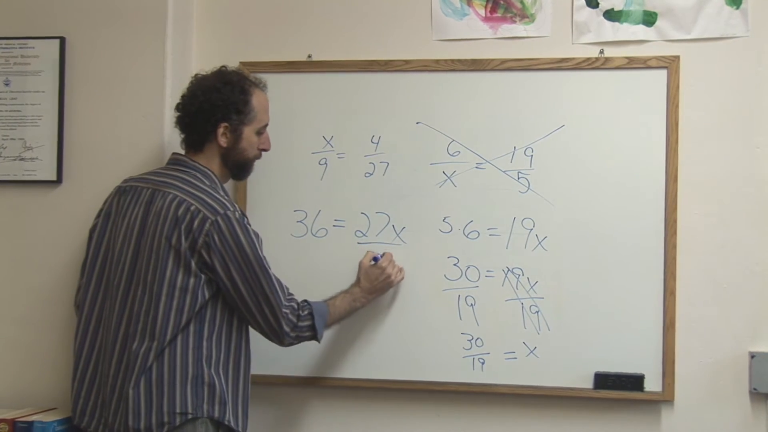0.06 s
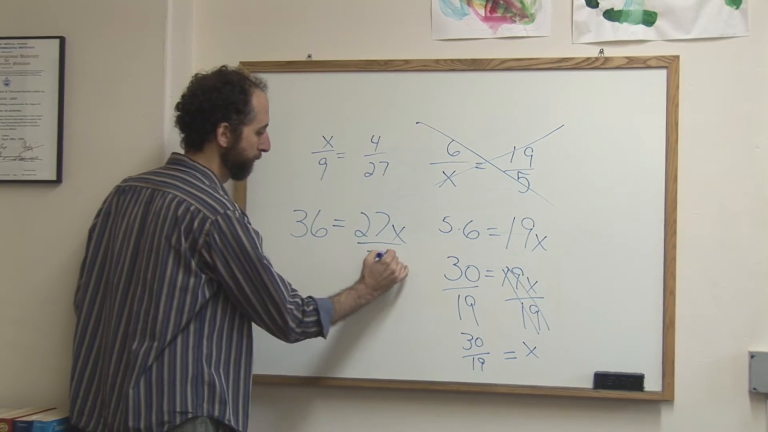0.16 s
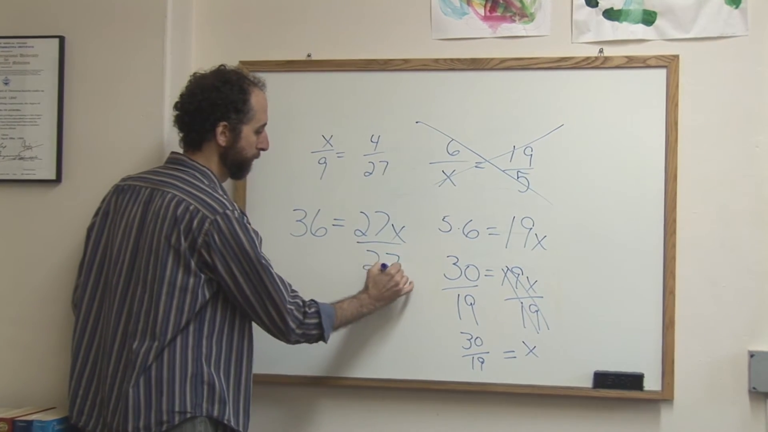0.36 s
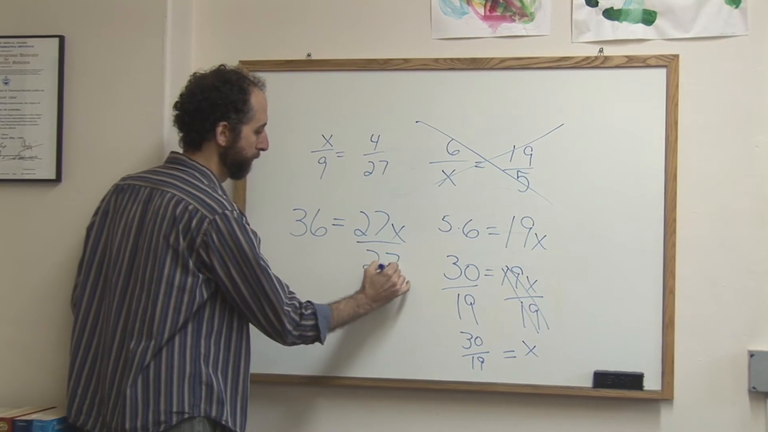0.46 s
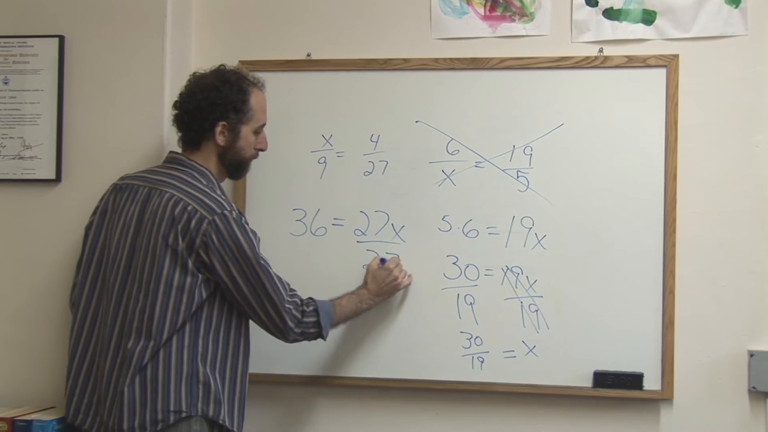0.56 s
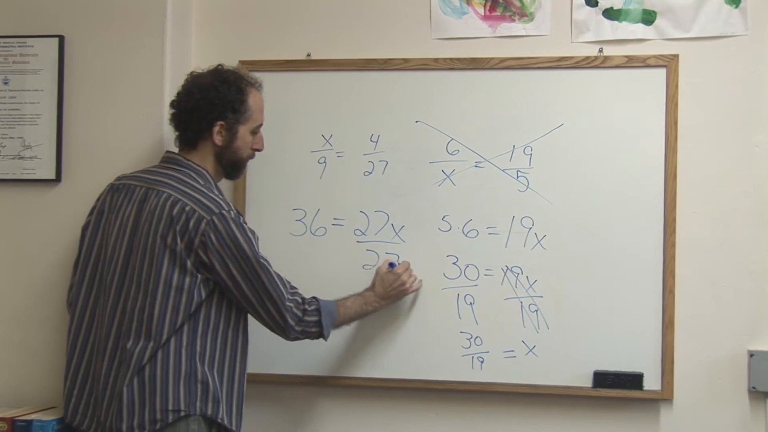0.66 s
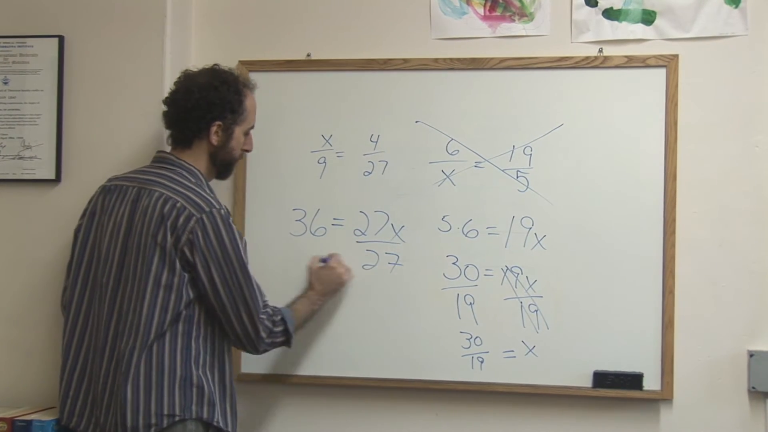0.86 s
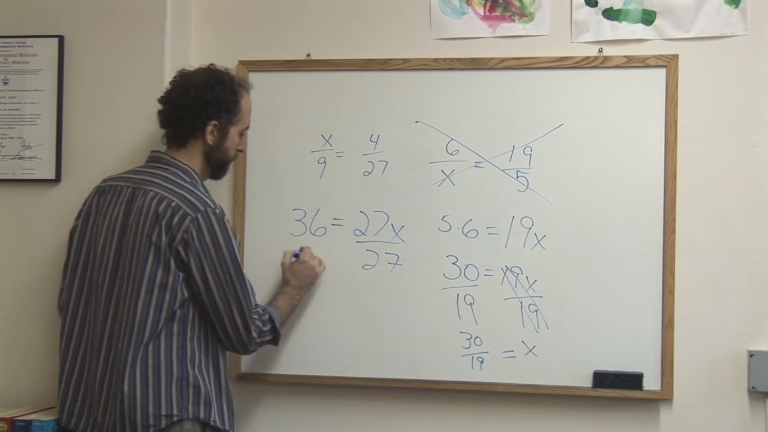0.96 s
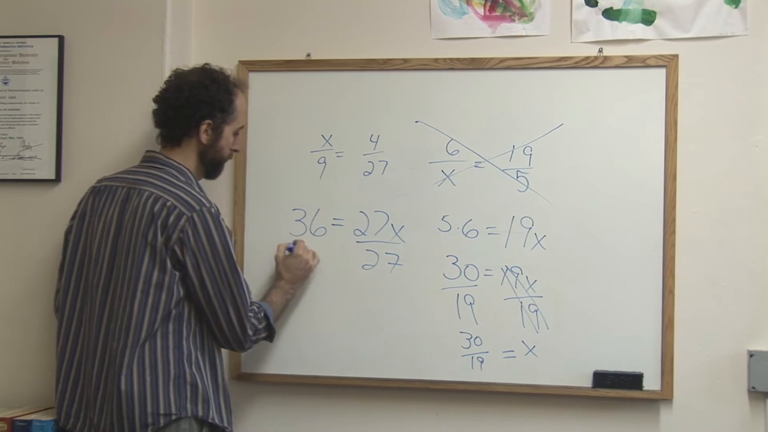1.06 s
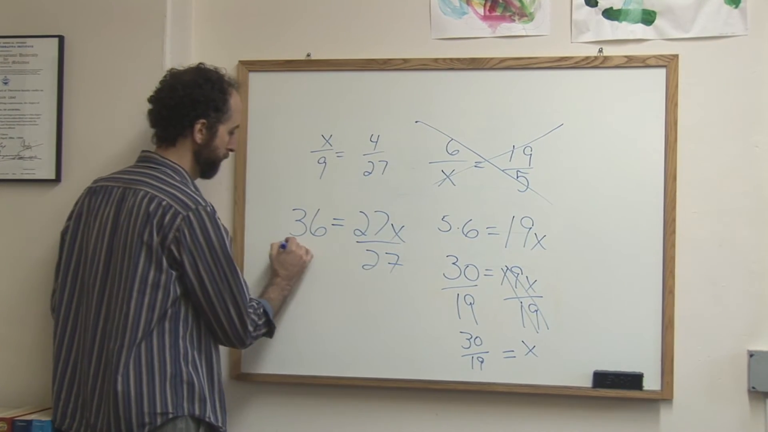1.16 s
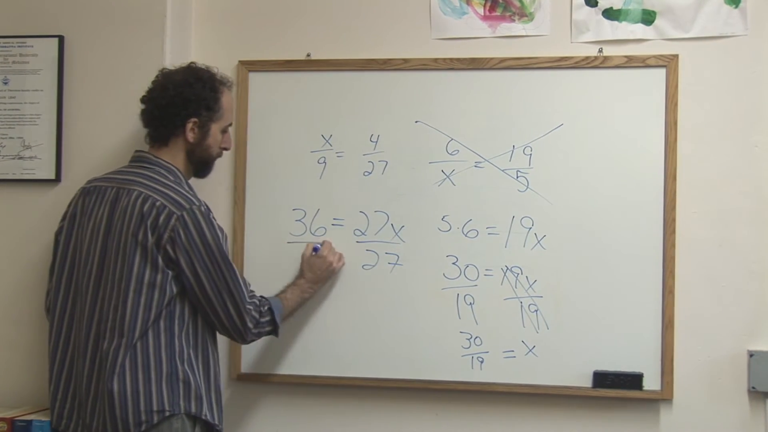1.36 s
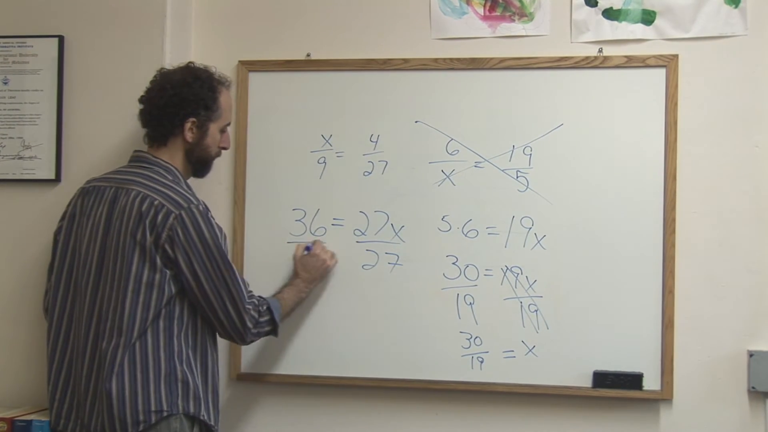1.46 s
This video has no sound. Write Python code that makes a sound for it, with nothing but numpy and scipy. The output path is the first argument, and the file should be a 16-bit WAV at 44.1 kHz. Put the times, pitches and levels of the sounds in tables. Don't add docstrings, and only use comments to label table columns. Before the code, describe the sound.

A felt marker writes on a whiteboard: a firm hollow knock, two lighter taps, another knock, a tiny plastic tick, then a softer landing with a brighter scratch. Small quiet room, ventilation rumble, distant camera microphone.

```python
import sys
import numpy as np
from scipy import signal
from scipy.fft import rfft, irfft
from scipy.io import wavfile
from scipy.ndimage import uniform_filter1d

SR = 44100
rng = np.random.default_rng(int(sys.argv[2]) if len(sys.argv) > 2 else 0)


def nominal_scale(level):
    x = np.asarray(level, float) / 20
    return 10 ** x


def unload_audio(sound):
    columns = np.transpose(np.atleast_2d(sound))
    steps = np.round(np.clip(columns, -1, 1) * 32767)
    wavfile.write(sys.argv[1], SR, steps.astype(np.int16))


N = 66150


def band(x, hz, width_hz):
    return signal.lfilter(*signal.iirpeak(min(hz, .45 * SR), hz / width_hz, fs=SR), x)


def unit(x):
    return x / np.sqrt(np.mean(x ** 2))


def walk(rate_hz):
    k = int(SR / rate_hz)
    smooth = uniform_filter1d(rng.standard_normal(N), k)
    return unit(uniform_filter1d(smooth, k))


def decay(t, t60):
    return np.exp(-np.log(1000) * t / t60)


def rings(t, modes):
    return sum(g * np.sin(2 * np.pi * f * t) * decay(t, t60) for f, g, t60 in modes)


def resonate(x, table):
    out = np.zeros(N)
    for k, (hz, width_hz, db) in enumerate(table):
        peak = band(band(x, hz, width_hz * 1.4), hz, width_hz * 1.4)
        out += (-1) ** k * nominal_scale(db) * unit(peak)
    return unit(out)


# [f/Hz, level/dB per Hz]
AIR_COLOUR = [(30, -7), (130, -7.5), (220, -15.5), (450, -23), (1000, -28.5), (2200, -33.5), (8000, -37.5),
              (14400, -40.5)]
# [f/Hz, level/dB rms, width/Hz]
HUM_LINES = [(35.62, -56.5, 3), (67.9, -67, 8.8), (121.95, -57, 3.26), (254, -67.5, 4.15)]


def air():
    hz = np.maximum(np.fft.rfftfreq(N, 1 / SR), 1)
    colour_hz, colour_db = np.transpose(AIR_COLOUR)
    colour = nominal_scale(np.interp(np.log(hz), np.log(colour_hz), colour_db)) * (hz > 26)
    noise = irfft(rfft(rng.standard_normal(N)) * colour, N)
    hum = np.zeros(N)
    for f, db, width_hz in HUM_LINES:
        level = nominal_scale(db + 0.96 * walk(18)) * np.sqrt(2)
        phase = 2 * np.pi * np.cumsum(f + width_hz * walk(8.2)) / SR
        hum += level * np.sin(phase)
    return nominal_scale(-52) * unit(noise) + hum


# [t/s, level/dB, contact/ms, ring/dB]
LANDINGS = [
    (-.06, -39.5, 1.05, -2),
    (0.088, -49.5, 3.7, 18),
    (.1531, -22.5, 1.037, 1),
    (.223, -37.5, 0.78, -1),
    (.2335, -30.5, 0.71, -8),
    (.543, -24, 1.24, -1.5),
    (.626, -40, 1.5, 7.5),
    (1.1992, -30, 2.23, -7),
    (1.285, -49, 1.05, 0.5),
    (0.408, -55, 2.4, -3),
]
# [f/Hz, level/dB, t60/s, polarity]
PANEL_MODES = [(243, -9, .12, 1), (282, -9, .1, -1), (332, -7, .22, -1), (346, -9, .65, 1),
               (367, -4, .55, 1), (384, -6, .2, 1), (405, -10, .5, 1), (427, -9, .45, 1), (519, 2, .15, -1),
               (600, -7, .16, -1), (642, -2, .08, -1), (800, -14, .06, 1), (1310, -12, .06, 1),
               (1660, -7, .045, -1)]
# [f/Hz, level/dB, t60/s]
WALL_MODES = [(82, -29, 0.017), (128, -23.5, 0.047), (194.3, -27, .15)]
# [f/Hz, width/Hz, level/dB, t60/s]
PANEL_RUSTLE = (800, 500, -25, .15)


def taps():
    thump_hz, thump_width_hz, soft_drop = 416, 278, 0.57
    ring_level_db, spot_db, radiate_hz = -10, 1.5, 220
    panel, low = np.zeros(N + 2 * SR), np.zeros(N + 2 * SR)
    t = np.arange(SR) / SR
    spots = rng.standard_normal((len(LANDINGS), len(PANEL_MODES)))
    noise = rng.standard_normal((len(LANDINGS), SR))
    pulse = (t == 0) * 1.
    wall = rings(t, [(f, nominal_scale(db), t60) for f, db, t60 in WALL_MODES])
    tick = nominal_scale(-10) * band(pulse, 2570, 3200)
    rustle_hz, rustle_width_hz, rustle_db, rustle_t60 = PANEL_RUSTLE
    for (start, db, ms, ring_db), spot, hiss in zip(LANDINGS, spots, noise):
        push = np.where(t < ms / 1000, np.sin(np.pi * t * 1000 / ms) ** 2, 0)
        hz = thump_hz * ms ** -soft_drop
        thump = band(pulse, hz, thump_width_hz * 2)
        thump = band(thump, hz, thump_width_hz)
        thump = band(thump, hz, thump_width_hz * 2)
        modes = [(f, sign * nominal_scale(mode_db + spot_db * v), t60)
                 for (f, mode_db, t60, sign), v in zip(PANEL_MODES, spot)]
        ring = nominal_scale(ring_level_db + ring_db) * rings(t, modes)
        rustle = nominal_scale(rustle_db) * unit(band(hiss, rustle_hz, rustle_width_hz)) * decay(t, rustle_t60)
        body = signal.fftconvolve(thump / thump.max() + ring + rustle, push[:400] / push.sum())[:SR]
        i = int((start + 1) * SR)
        panel[i:i + SR] += nominal_scale(db + 6.5) * (body + tick)
        low[i:i + SR] += nominal_scale(db + 8.5) * wall
    radiated = signal.sosfilt(signal.butter(2, radiate_hz, "high", fs=SR, output="sos"), panel)
    return (radiated + low)[SR:SR + N]


def room(x):
    t60_s, gap_s, top_hz = .5, .006, 1500
    t = np.arange(SR) / SR
    tail = rng.standard_normal(SR) * 1000. ** (-t / t60_s) * np.clip(t / gap_s - .5, 0, 1)
    tail = signal.lfilter(*signal.butter(1, top_hz, fs=SR), tail) + 0.28 * tail
    return nominal_scale(-13) * signal.fftconvolve(x, tail / np.sqrt(np.sum(tail ** 2)))[:N]


# [t/s, length/s, rasp level/dB, panel rub level/dB, slant 0-1]
STROKE_LIST = [
    (.165, .07, -65, -62, .1),
    (.27, .09, -64.5, -64, .1),
    (.548, .065, -64.5, -60, .1),
    (1.2, .15, -61, -56, .9),
    (1.33, .04, -70, -70, .9),
]
# [f/Hz, width/Hz, level/dB]
UPRIGHT_RASP = [(4880, 490, -14.5), (6660, 2100, -14), (10800, 2800, -25.5), (2980, 1700, -16.5)]
# [f/Hz, width/Hz, level/dB]
SLANTED_RASP = [(4080, 600, 2), (6060, 900, 0), (7000, 1800, -0.5), (10940, 1700, -3), (3260, 350, -4),
                (12800, 2500, -11.5)]
# [f/Hz, width/Hz, level/dB]
PANEL_RUB = [(370, 47, -10), (616, 74, -6), (835, 59, -9), (968, 58, 1.5), (1127, 63, 2), (1282, 92, -5),
             (1495, 370, -7)]
# [t/s, length/s, level/dB, f/Hz, width/Hz]
LIFT_SCUFF = (1.345, .06, -57, 740, 420)


def strokes():
    attack_share, release_s = .6, .025
    rub_power = 3.5
    t = np.arange(N) / SR
    grit = rng.standard_normal(N) * nominal_scale(1.5 * rng.exponential(size=N))
    upright = resonate(grit, UPRIGHT_RASP)
    slanted = resonate(grit, SLANTED_RASP)
    rub = resonate(grit, PANEL_RUB)
    start, length, db, hz, width_hz = LIFT_SCUFF
    swell = np.interp(t, [start, start + 0.012, start + length], [0, 1, 0])
    out = nominal_scale(db) * swell * resonate(grit, [(hz, width_hz, 0)])
    for start, length, rasp_db, rub_db, slant in STROKE_LIST:
        end = start + length
        corners = [start, start + attack_share * length, end, end + release_s]
        speed = np.interp(t, corners, [0, 1, 1, 0]) ** .6
        slant = np.clip(slant, 0, 1)
        rasp = (1 - slant) * upright + slant * slanted
        out = out + nominal_scale(rasp_db) * speed * rasp + nominal_scale(rub_db) * speed ** rub_power * rub
    return out * nominal_scale(3 * walk(27))


# [t/s, level/dB, f/Hz, rise/s, t60/s]
BARREL_TICK = (.6754, -45, 4450, .0014, .010)
# [f/Hz, level/dB]
BARREL_MODES = [(3800, -7), (2720, -11)]


def click():
    start, db, hz, rise, t60 = BARREL_TICK
    t = np.maximum(np.arange(N) / SR - start, 0)
    swell = np.sin(np.pi / 2 * np.minimum(t / rise, 1)) ** 2
    swell = swell * decay(np.maximum(t - rise, 0), t60)
    tone = sum(nominal_scale(g) * np.sin(2 * np.pi * f * t) for f, g in [(hz, 0)] + list(BARREL_MODES))
    return nominal_scale(db) * swell * tone


def scene():
    near = taps() + strokes() + click()
    return (near + room(near) + air())[None, :]


def roll_off(x):
    return signal.sosfilt(signal.butter(12, 14740, fs=SR, output="sos"), x)


def record(dry):
    top_hz, top_band_hz, kept_share, frame, whim_db = 14420, 13600, .4, 1024, 1.5
    x = signal.sosfilt(signal.ellip(10, .2, 60, top_hz, fs=SR, output="sos"), dry)
    low = signal.sosfiltfilt(signal.ellip(8, .05, 40, top_band_hz, fs=SR, output="sos"), x)
    top = x - low
    power = uniform_filter1d(top ** 2, size=frame)[0, frame // 2::frame]
    whim = np.repeat(rng.standard_normal(len(power)), 2)[:len(power)]
    power = power * nominal_scale(whim_db * whim)
    kept = np.repeat(power > np.quantile(power, 1 - kept_share), frame)
    kept = uniform_filter1d(np.resize(kept, N) * 1., size=frame // 4)
    mix = low + kept * top
    return roll_off(mix)


dry = scene()
out = record(dry)
unload_audio(out)
```